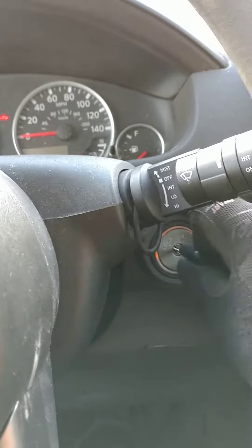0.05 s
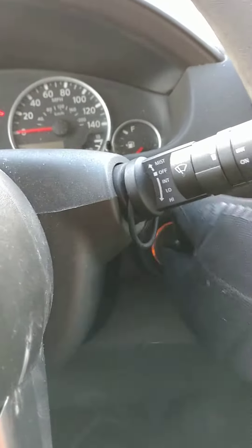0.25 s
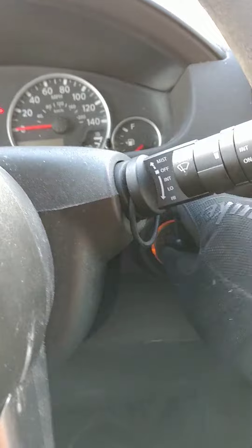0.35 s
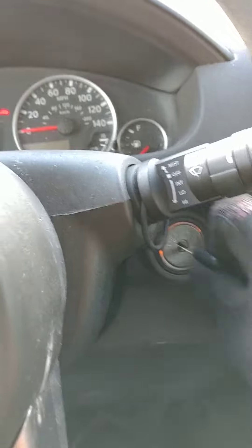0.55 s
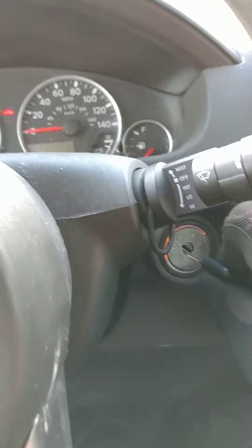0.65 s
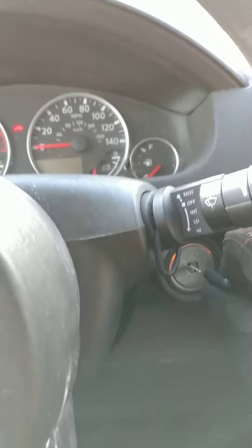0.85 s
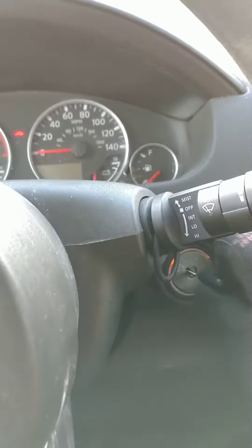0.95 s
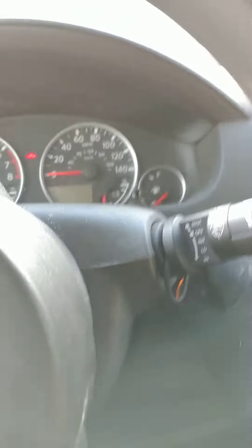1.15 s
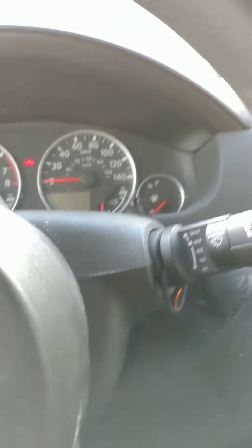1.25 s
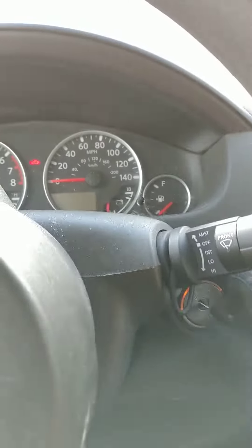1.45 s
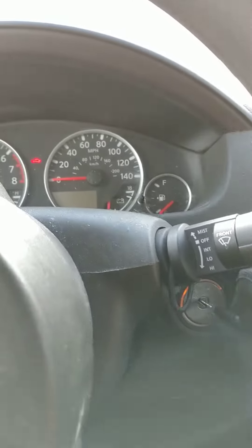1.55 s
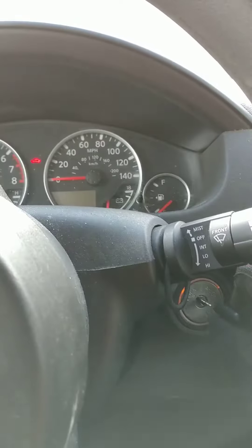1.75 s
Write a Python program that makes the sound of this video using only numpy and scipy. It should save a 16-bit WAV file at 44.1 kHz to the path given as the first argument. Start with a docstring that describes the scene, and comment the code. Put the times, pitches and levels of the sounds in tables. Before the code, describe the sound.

A car key works an ignition lock, close and dry. Small scrapes and ticks at the start, then a rasping push ending in a hard snap and clack near 0.3 s. A lighter ticking withdrawal runs 0.4-0.65. After a pause, a second sharp push at 0.96-1.17 clacks loudly, and a softer pull-out follows at 1.35-1.6. Plastic column thuds underneath; short cabin tail, faint hiss, then quiet.

```python
"""A key is pushed into a car's ignition lock and pulled out again, twice, close to a phone held in the cabin.
The blade scrapes in dense slips past sprung wafers that tick and snap, and the key clacks at its stops. The
plastic column shell around the lock shudders, sways and thuds: struck or noise-driven resonances. The phone's
two channels differ in phase and level over frequency, the same for everything heard. The cabin answers with a
brief tail of decaying noise, over a quiet floor of shaped noise."""
import sys
import numpy as np
from scipy import signal
from scipy.fft import rfft, irfft, next_fast_len
from scipy.io import wavfile
from scipy.ndimage import uniform_filter1d

SR = 44100
rng = np.random.default_rng(int(sys.argv[2]) if len(sys.argv) > 2 else 0)


def inscribe(sig):
    """Save sig as 16-bit PCM at rate SR to the path in sys.argv[1].

    A 1-D sig is mono; a 2-D sig holds one channel per row.
    Samples are clipped to [-1, 1] before scaling.
    """
    pcm = np.round(np.clip(np.atleast_2d(sig).T, -1, 1) * 32767)
    wavfile.write(sys.argv[1], SR, pcm.astype(np.int16))


def magnitude_from_level(level_db):
    """Linear magnitude for a level in decibels (20 dB per decade)."""
    exponent = np.asarray(level_db, float) / 20
    return 10 ** exponent


N = 79380  # 1.8 s

# Cabin air and microphone hiss. Each row: frequency in Hz, relative density in dB per Hz.
FLOOR_SPECTRUM = [(12, -32), (20, -5.5), (169, -3), (224, -14), (314, -9), (599, -12), (1080, -12.5),
                  (2370, -18.5), (3230, -19.5), (3620, -29), (15200, -31), (16500, -23)]
# Likeness of the floor in the two channels ahead of the ports. Each row: frequency in Hz, likeness (-1 to 1).
FLOOR_LIKENESS = [(60, 0.2), (250, 0.1), (640, 1), (1000, 1), (1700, 0.42), (2200, 1), (4000, 0.24),
                  (9000, 0.13), (15000, 0.49)]
FLOOR_DB = -54

# How fast the cabin's answer dies. Each row: frequency in Hz, time to fall 60 dB in seconds.
CABIN_DECAY = [(150, 0.15), (1000, 0.032), (5000, 0.06), (15000, 0.029)]
# Likeness of the cabin tail in the two channels ahead of the ports. Each row: frequency in Hz, likeness (0 to 1).
CABIN_LIKENESS = [(100, 0.2), (400, 0.068), (1050, 0.81), (1500, 0.39), (2250, 1), (3500, 0.1),
                  (8000, 0.067), (15000, 0.17)]
CABIN_DB = -2.5

# Knocks of the column shell. Each row: start in seconds, level in dB before the soft rise,
# pitch in Hz, time to fall 60 dB in seconds.
SHELL_THUDS = [(0.065, -33.5, 338, 0.061), (0.089, -39.5, 112, 0.1), (0.247, -19, 164.6, 0.14),
               (0.369, -35, 135, 0.069), (.538, -27.5, 114, 0.088), (.62, -36.5, 328, 0.13),
               (.966, -35, 180.5, 0.22), (1.044, -29.5, 600, 0.084), (1.099, -22.5, 160, 0.11),
               (1.167, -37.5, 86, 0.15), (1.218, -38, 157, 0.071), (1.468, -35, 92, 0.088),
               (1.556, -34.5, 314.5, 0.17)]
THUD_RISE_S = 0.008

# Resonances of the plastic column shell. Each row: frequency in Hz, width in Hz, relative level in dB.
SHELL_BODY = [(160, 54, 2), (320.7, 59.5, -1), (456, 86, -2.5), (600, 134, -1), (788, 198, -5.5),
              (1022, 132, -6), (1656, 322, -4)]
# Spectrum of the hand rocking the column. Each row: frequency in Hz, relative density in dB per Hz.
SWAY_SPECTRUM = [(20, -54), (45, -2), (90, 7.5), (160, -2.5), (260, 1)]
SHUDDERS_PER_S, SHUDDER_SPREAD_DB, RUMBLE_DB = 900, 3.97, 0.5
SWAY_DB, SWAY_LINGERS_S = -56.5, 0.028

# Movement of the key, one list per stroke. Each row: time in seconds, scrape in dB, hand force in dB,
# both ahead of the overall scrape and rumble levels.
KEY_STROKES = [
    [(0.0, -53, -42.5), (0.028, -88, -81), (0.04, -86, -96)],
    [(0.062, -52, -45.5), (0.066, -35, -35.5), (0.08, -59, -58.5), (0.084, -71, -56), (0.092, -68, -47),
     (0.106, -69, -51), (0.13, -74, -82)],
    [(0.165, -65, -49), (0.197, -41.5, -41), (0.205, -53, -46), (0.227, -40.5, -49.5), (0.255, -35, -30),
     (0.291, -30.5, -37.5), (0.315, -80, -43.5), (0.33, -74, -53)],
    [(0.4, -76, -72), (0.408, -51, -87), (0.42, -80, -73), (0.452, -58, -50.5), (0.458, -50, -78),
     (0.466, -79, -76), (0.486, -41, -47), (0.524, -39, -47), (0.602, -49.5, -54), (0.614, -34, -39.5),
     (0.66, -97, -88.5)],
    [(0.96, -37, -44), (0.974, -46, -43), (1.028, -54, -47.5), (1.042, -58, -41.5), (1.052, -49, -44.5),
     (1.078, -49, -46.5), (1.098, -35.5, -30), (1.136, -35.5, -38), (1.142, -37, -35.5), (1.172, -65, -49),
     (1.2, -76, -76)],
    [(1.33, -86, -69), (1.336, -92, -57), (1.398, -48.5, -55.5), (1.438, -40, -44.5), (1.478, -40.5, -49),
     (1.514, -58, -67), (1.52, -36, -53), (1.54, -65, -50), (1.548, -46, -46), (1.572, -48, -49.5),
     (1.6, -93, -52)],
]
# Colour of the blade's scrape. Each row: frequency in Hz, relative density in dB per Hz.
SCRAPE_SPECTRUM = [(1000, -15.5), (1700, -8), (2500, -1), (4000, -8.5), (5700, -3.5), (7200, -5.5),
                   (8300, -5), (11000, -4.5), (13000, -1), (14200, -2.5), (15300, 2), (16200, -17)]
SLIPS_PER_S, SLIP_SPREAD_DB, SCRAPE_DB = 6000, 3.5, -3.5

# Resonances of the lock barrel. Each row: frequency in Hz, width in Hz, relative level in dB.
BARREL_BODY = [(1730, 1110, 0), (3040, 2460, -1.5), (5265, 1790, 1), (6350, 2130, -4), (13490, 1420, -8)]
# The key meeting its stops. Each row: start in seconds, level of the first impulse in dB.
STOP_CLACKS = [(.2874, -11.5), (.3561, -49), (.6036, -35), (.6156, -26.5), (1.143, -12), (1.172, -37.5),
               (1.3478, -42.5), (1.5464, -29), (1.5633, -32.5)]
CLACK_T60_S, CLACK_RATTLE_DB = 0.014, -15.5

# Resonances of a wafer. Each row: frequency in Hz, width in Hz, relative level in dB.
WAFER_BODY = [(8020, 3700, -7.5), (10600, 2300, -5.5), (12990, 1930, -2.5), (15950, 1800, -0.5)]
# Wafers dropping onto the blade. Each row: start in seconds, level of the bright part in dB,
# level of the duller barrel part in dB relative to the bright part.
WAFER_TICKS = [(0.0044, -30.5, -2.5), (0.063, -30.5, -20), (0.075, -56, -27), (0.0912, -32, -39),
               (0.169, -52, 9), (0.1855, -41, -0.5), (0.197, -29.5, -4.5), (0.2146, -32, -6),
               (0.227, -29.5, -6), (0.2479, -27, 0), (0.2783, -25, -9), (0.4043, -56, 5.5),
               (0.457, -51, -2.5), (0.476, -39, -5.5), (0.4985, -39.5, -0.5), (0.5166, -32, -12),
               (0.5344, -28.5, -9.5), (0.5541, -32, -29), (0.5855, -27.5, -28), (0.9876, -34, -19),
               (0.9943, -37, 2), (1.0327, -45, 8.5), (1.042, -32.5, -1.5), (1.0502, -43, 1),
               (1.067, -30, -11), (1.0774, -25, -9), (1.0859, -23.5, -2.5), (1.1156, -25, -6.5),
               (1.1312, -25.5, -2), (1.37, -45.5, -3.5), (1.3992, -31.5, -11), (1.417, -33, -14),
               (1.438, -26.5, -27), (1.4776, -34, -34), (1.5195, -37, -13)]
TICK_T60_S, TICK_RATTLE_DB = 0.017, -9
# Wafers that snap hard. Each row: start in seconds, level of the first impulse in dB.
WAFER_SNAPS = [(.2633, -11.5), (.9606, -11), (1.1026, -11)]
SNAP_T60_S, SNAP_RATTLE_DB, SNAP_BARREL_DB = 0.005, -13.5, -1.5

# Phase between the microphone ports. Each row: frequency in Hz, half turns by which the left port leads.
PORT_LEAD = [(0, -.5), (250, -.15), (700, -.2), (1150, 0), (1750, .85), (2550, 1), (3200, 1.9), (4300, 2.9),
             (5700, 4), (7100, 5), (8250, 6), (10700, 8.1), (12850, 10), (15000, 12), (17000, 13.8)]
# Level between the microphone ports. Each row: frequency in Hz, left over right in dB.
PORT_BALANCE = [(80, 6), (260, 1), (500, 11), (800, -0.5), (1100, 0), (1550, -8), (2000, -0.5), (5000, 0),
                (6600, 3.5), (10000, 1.5), (12500, -1.5), (15500, -1)]
TOP_HZ, TOP_BAND_DB = 15850, -39


def unit(x):
    """Scales a signal to an rms of 1."""
    return x / np.sqrt(np.mean(x ** 2) + 1e-20)


def along(points, hz):
    """Reads (Hz, value) points along a logarithmic frequency axis."""
    f, value = np.transpose(points)
    return np.interp(np.log(hz + 1), np.log(f + 1), value)


def filtered(x, response):
    """Filters x by a real or complex response of frequency."""
    m = next_fast_len(N + SR // 4)
    spectrum = rfft(x, m) * response(np.fft.rfftfreq(m, 1 / SR))
    return irfft(spectrum, m)[..., :N]


def resonances(table):
    """Causal response of a body: second-order resonances summed with alternating sign."""
    def response(f):
        total = 0
        for k, (centre, width, db) in enumerate(table):
            damping = 1j * f * width
            total = total + (-1) ** k * magnitude_from_level(db) * damping / (centre * centre - f * f + damping)
        return total
    return response


def stroke_gain(column):
    """Gain over time from one column of the key strokes, practically silent between them."""
    t, gain = np.arange(N) / SR, np.zeros(N)
    for rows in KEY_STROKES:
        rows = np.array(rows)
        gain += magnitude_from_level(np.interp(t, rows[:, 0], rows[:, column], -120, -120))
    return uniform_filter1d(gain, size=16)


def grains(rate, spread_db):
    """Random stick-slip: sparse impulses of either sign and scattered size."""
    hit = rng.random(N) < rate / SR
    sign_noise, size_noise = rng.standard_normal((2, N))
    return hit * np.sign(sign_noise) * magnitude_from_level(spread_db * size_noise)


def blows(events, t60, rattle_db, body):
    """Each contact, a sharp impulse and a dying noise rattle, rings a body whose impulse response peaks at 1."""
    drive, t = np.zeros(N + SR), np.arange(SR // 10) / SR
    rattles = rng.standard_normal((len(events), len(t)))
    for (start, db), noise in zip(events, rattles):
        burst = magnitude_from_level(rattle_db - 60 * t / t60) * noise
        burst[0] = 1
        drive[round(start * SR):][:len(t)] += magnitude_from_level(db) * burst
    impulse = np.eye(1, N)[0]
    peak = np.abs(filtered(impulse, resonances(body))).max()
    return filtered(drive[:N], resonances(body)) / peak


def floor():
    """Quiet cabin air and microphone hiss: shaped noise, partly alike in both channels."""
    def mid_side(hz):
        turn = np.arccos(np.clip(along(FLOOR_LIKENESS, hz), -1, 1)) / 2
        return magnitude_from_level(along(FLOOR_SPECTRUM, hz)) * [np.cos(turn), np.sin(turn)]
    mid, side = filtered(rng.standard_normal((2, N)), mid_side)
    return magnitude_from_level(FLOOR_DB) * unit(np.array([mid + side, mid - side]))


def cabin(x):
    """The cabin's short tail: noise with each frequency dying at its own speed, redrawn every 0.15 s."""
    out = np.zeros((2, N + SR))
    step, delay = SR * 3 // 20, 60  # samples
    for start in range(0, N, step):
        hz, t, noise = signal.stft(rng.standard_normal((2, SR // 5)), SR, nperseg=128)
        turn = np.arccos(np.clip(along(CABIN_LIKENESS, hz), 0, 1))[:, None] / 2
        decay = magnitude_from_level(-60 * t / along(CABIN_DECAY, hz)[:, None])
        shaped = noise * [np.cos(turn), np.sin(turn)] * decay
        mid, side = signal.istft(shaped, SR, nperseg=128)[1]
        tail = mid + np.array([side, -side])
        tail = tail / np.linalg.norm(tail[0])
        wet = signal.fftconvolve(x[None, start:start + step], tail, axes=1)
        out[:, start + delay:start + delay + wet.shape[1]] += wet
    return out[:, :N]


def thuds():
    """At each jolt one panel of the shell rings as a decaying sine with a soft onset."""
    start, db, hz, t60 = np.transpose(SHELL_THUDS)[:, :, None]
    t = np.clip(np.arange(N) / SR - start, 0, None)
    rise = 1 - np.exp(-t / THUD_RISE_S)
    rings = magnitude_from_level(db - 60 * t / t60) * rise * np.sin(2 * np.pi * hz * t)
    return rings.sum(axis=0)


def shell():
    """The column shell resonates to shudders under the hand's force, and its low sway lingers a little."""
    force = stroke_gain(column=2)
    shudders = grains(SHUDDERS_PER_S, SHUDDER_SPREAD_DB)
    body = resonances(SHELL_BODY)
    rumble = filtered(force * shudders, body) / filtered(shudders, body).std()

    smoothed = filtered(force, lambda hz: 1 / (1 + 2j * np.pi * hz * SWAY_LINGERS_S))
    lingering = unit(np.sqrt(np.abs(smoothed)))
    spectrum = SWAY_SPECTRUM + [(600, -94)]  # shuts out everything above the sway
    rocking = unit(filtered(rng.standard_normal(N), lambda hz: magnitude_from_level(along(spectrum, hz))))
    return magnitude_from_level(RUMBLE_DB) * rumble + magnitude_from_level(SWAY_DB) * lingering * rocking


def blade():
    """The sliding blade scrapes: dense slips of metal on metal, coloured and swelling with each stroke."""
    slips = grains(SLIPS_PER_S, SLIP_SPREAD_DB)
    scrape = unit(filtered(slips, lambda hz: magnitude_from_level(along(SCRAPE_SPECTRUM, hz))))
    return magnitude_from_level(SCRAPE_DB) * stroke_gain(column=1) * scrape


def stops():
    """The key meets its stops and the barrel clacks."""
    return blows(STOP_CLACKS, CLACK_T60_S, CLACK_RATTLE_DB, BARREL_BODY)


def wafers():
    """Each sprung wafer drops onto the blade, a bright tick, partly passed to the barrel; some snap hard."""
    bright_events = [(s, db) for s, db, _ in WAFER_TICKS]
    dull_events = [(s, db + relative) for s, db, relative in WAFER_TICKS]
    bright = blows(bright_events, TICK_T60_S, TICK_RATTLE_DB, WAFER_BODY)
    dull = blows(dull_events, TICK_T60_S, TICK_RATTLE_DB, BARREL_BODY)
    snap_body = WAFER_BODY + [(hz, width, db + SNAP_BARREL_DB) for hz, width, db in BARREL_BODY]
    snaps = blows(WAFER_SNAPS, SNAP_T60_S, SNAP_RATTLE_DB, snap_body)
    return bright + dull + snaps


def ports(x):
    """The two channels' phase lead and level gap over frequency: each channel takes half of both."""
    f, half_turns = np.transpose(PORT_LEAD)
    half = np.array([[.5], [-.5]])  # left, right

    def response(hz):
        level = magnitude_from_level(half * along(PORT_BALANCE, hz))
        return level * np.exp(1j * np.pi * half * np.interp(hz, f, half_turns))
    return filtered(x, response)


def scene():
    """The lock with its cabin tail, the thuds ringing dry and clear, and the floor."""
    lock = wafers() + stops() + blade() + shell()
    return lock + magnitude_from_level(CABIN_DB) * cabin(lock) + thuds() + floor()


def band_limit(x):
    """A steep low-pass at the top of the band."""
    return signal.sosfilt(signal.butter(12, 17080, fs=SR, output="sos"), x)


def record(dry):
    """The phone's two ports, then a steep treble drop to a faint top band."""
    def treble_drop(hz):
        return magnitude_from_level(TOP_BAND_DB) + 1 / (1 + (hz / TOP_HZ) ** 120)
    mix = filtered(ports(dry), treble_drop)
    return band_limit(mix)


dry = scene()
out = record(dry)
inscribe(out)
```